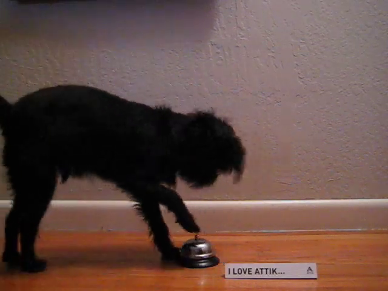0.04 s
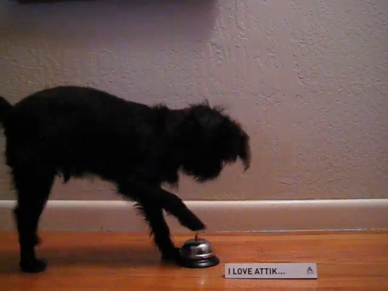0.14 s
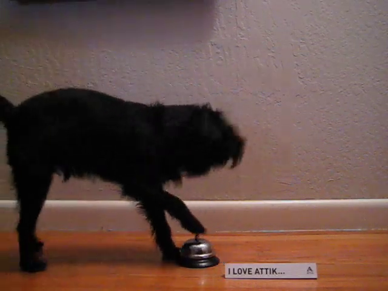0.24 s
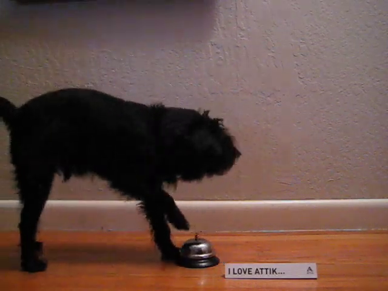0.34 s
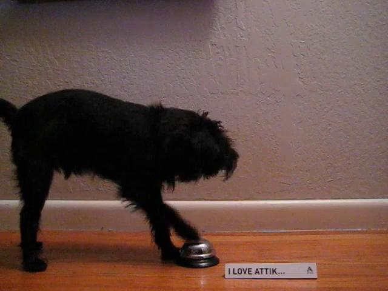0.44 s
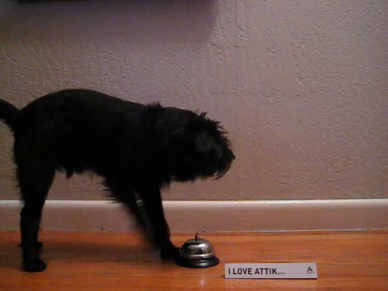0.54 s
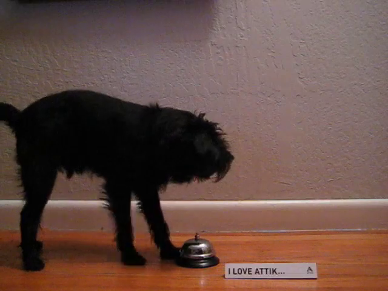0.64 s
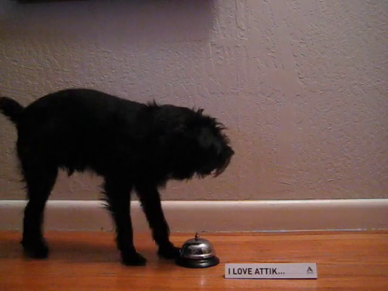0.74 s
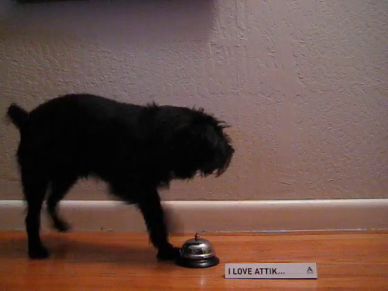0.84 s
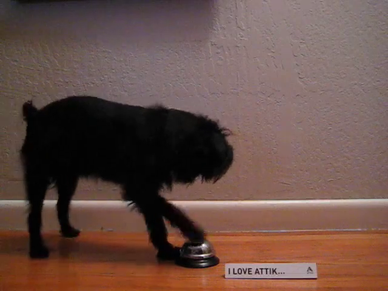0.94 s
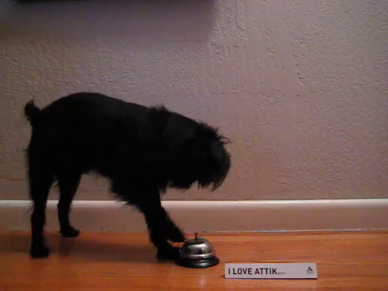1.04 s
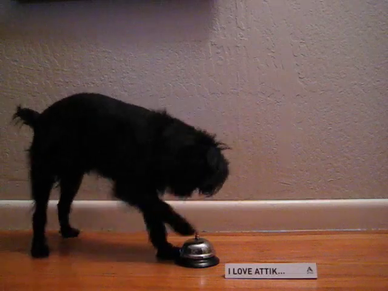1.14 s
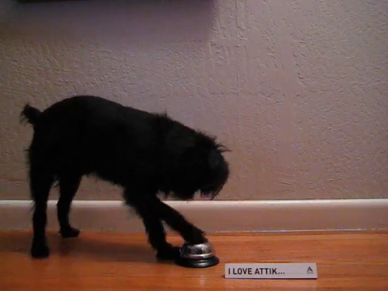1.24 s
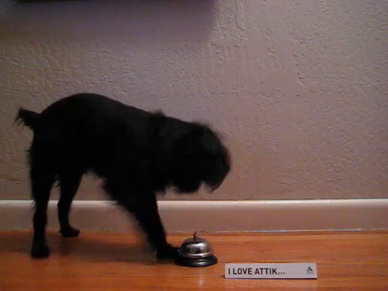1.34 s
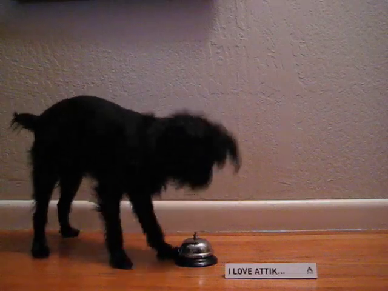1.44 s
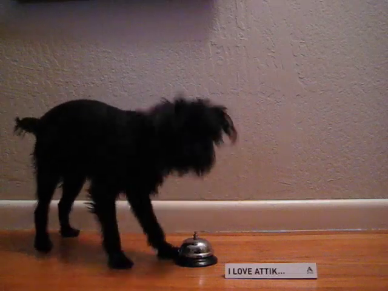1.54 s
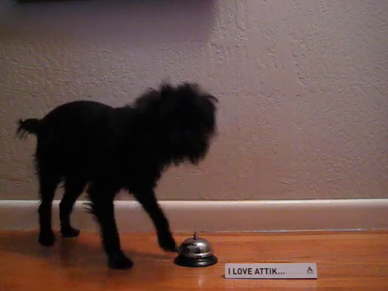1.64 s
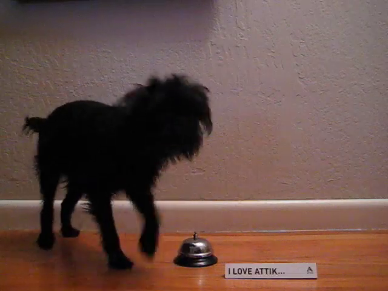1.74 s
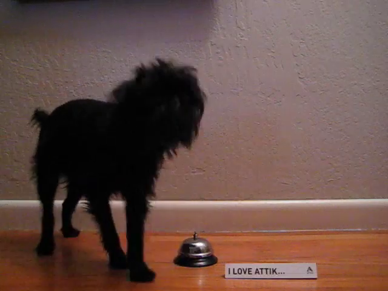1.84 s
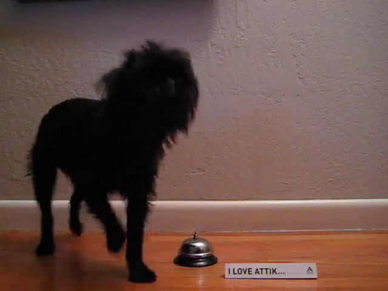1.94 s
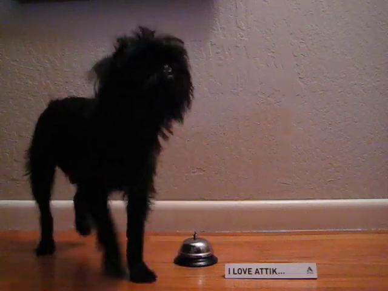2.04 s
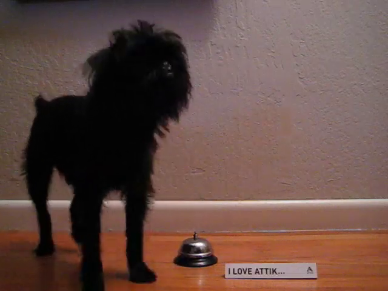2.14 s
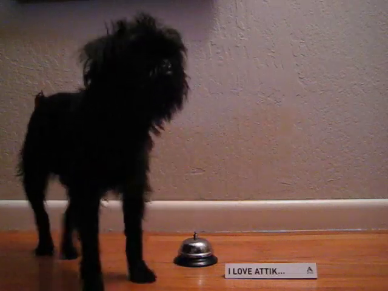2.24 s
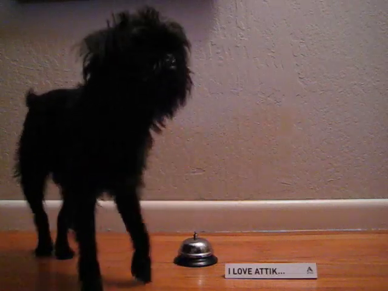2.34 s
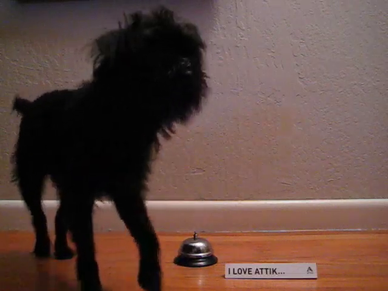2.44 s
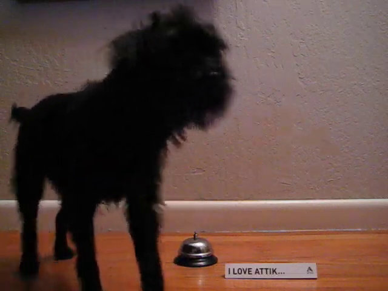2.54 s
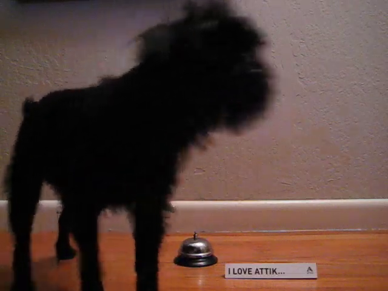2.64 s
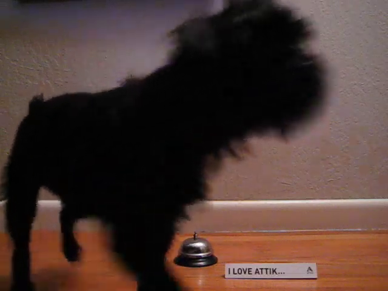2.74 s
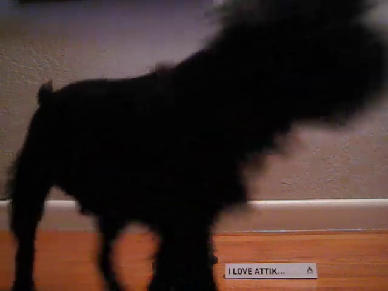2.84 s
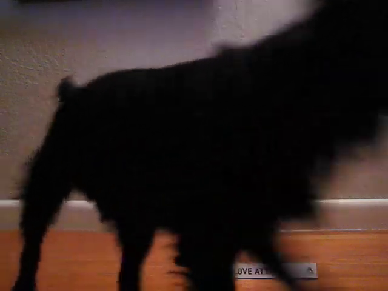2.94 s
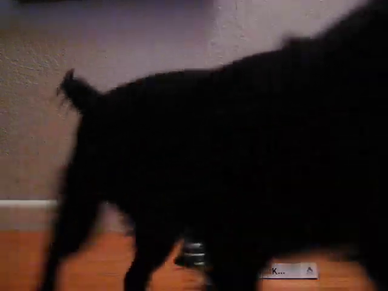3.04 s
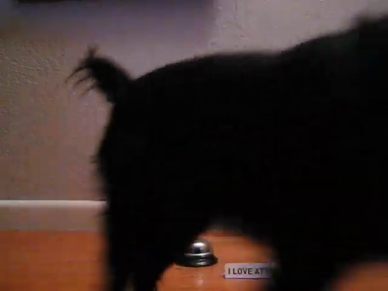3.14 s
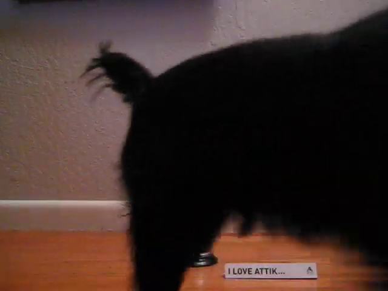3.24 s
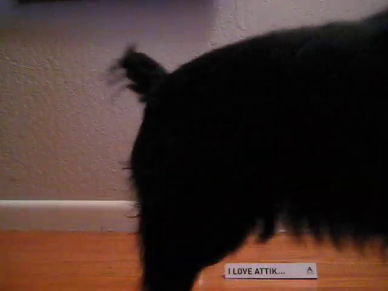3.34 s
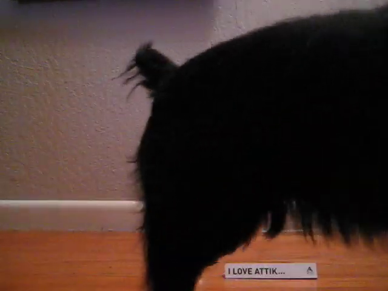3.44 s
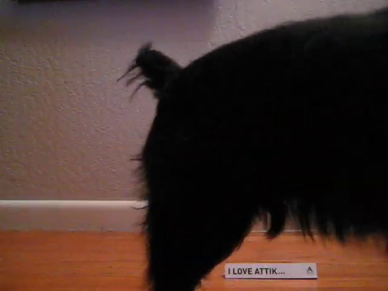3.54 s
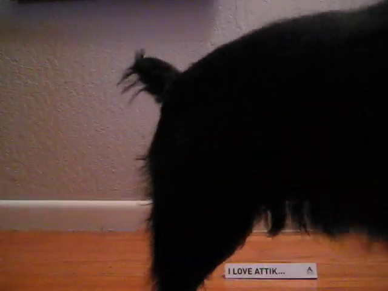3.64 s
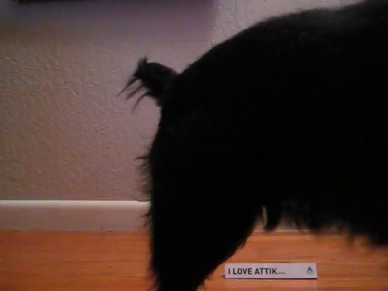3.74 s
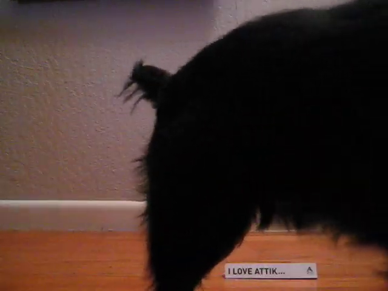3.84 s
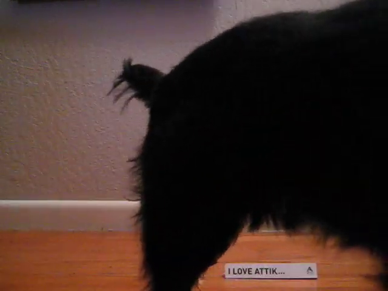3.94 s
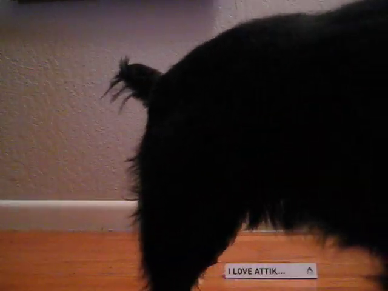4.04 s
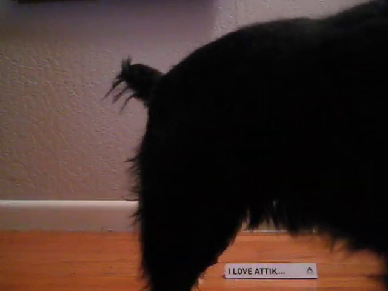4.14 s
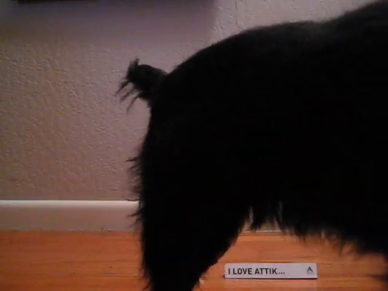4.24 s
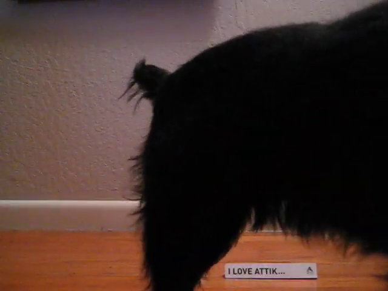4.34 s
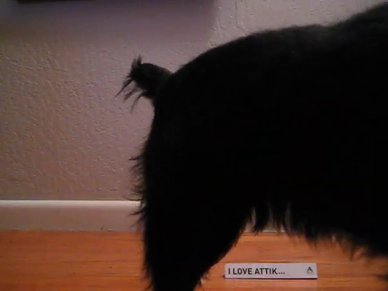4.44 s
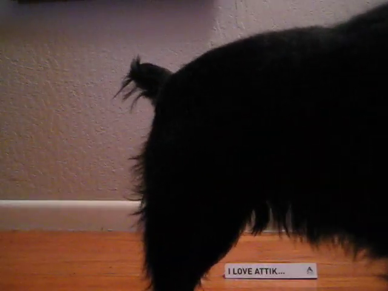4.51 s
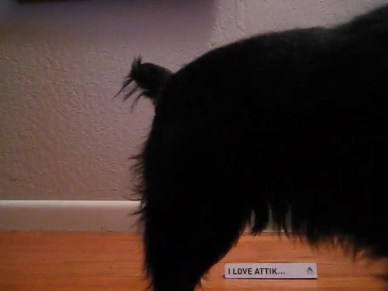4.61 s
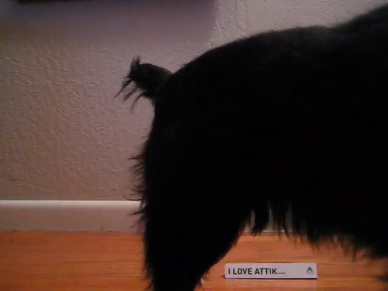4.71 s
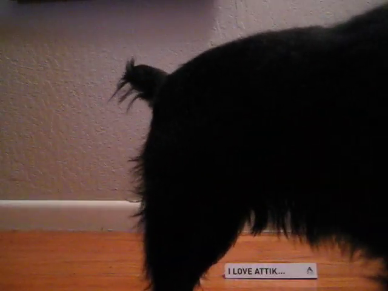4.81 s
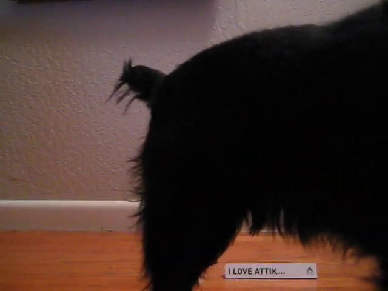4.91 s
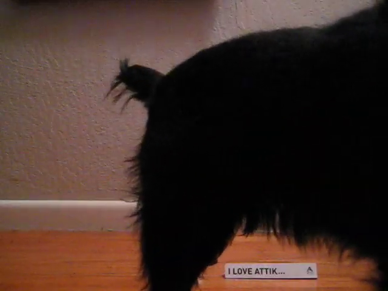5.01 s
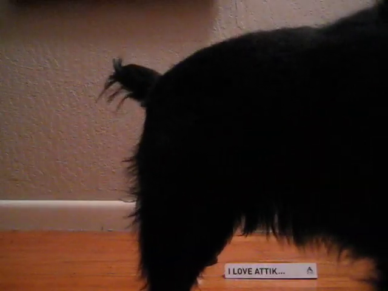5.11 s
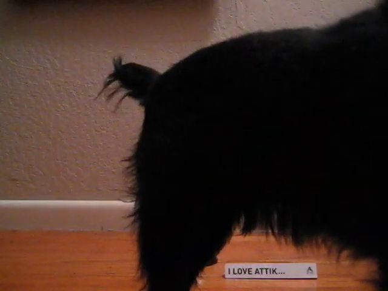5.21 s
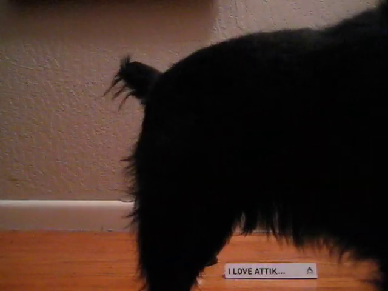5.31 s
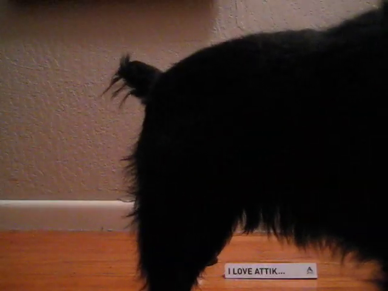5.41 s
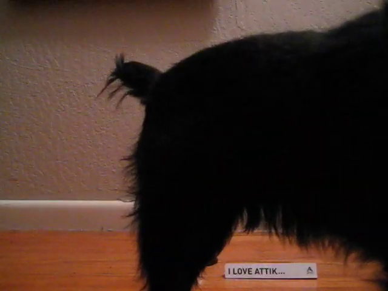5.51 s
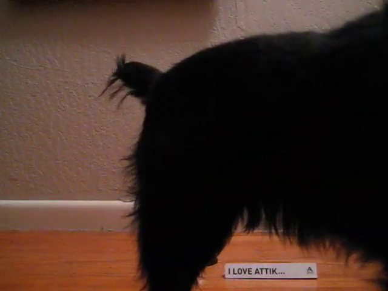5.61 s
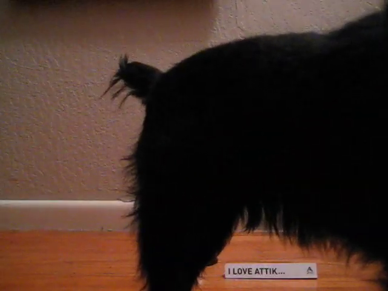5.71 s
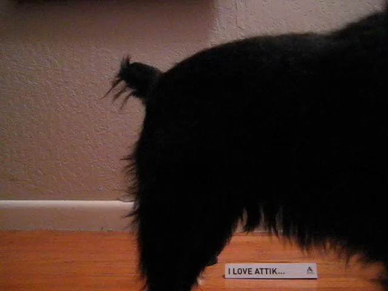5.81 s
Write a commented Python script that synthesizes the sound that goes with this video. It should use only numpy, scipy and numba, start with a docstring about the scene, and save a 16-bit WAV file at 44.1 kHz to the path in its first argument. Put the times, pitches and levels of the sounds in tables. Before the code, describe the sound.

A steady hiss and faint hum run throughout in a small room with a bare wooden floor. In the first second or so, a dog's paw nudges a steel desk bell, making light scrapes and damped metallic clicks, the clearest at about 0.5 seconds, with a claw tap on the floor just after. At 1.3 seconds the bell is struck once: a sharp, slightly clipped crack and a loud, bright ding. Its highest overtones die quickly, while the main tone wavers and fades slowly, lingering faintly to the end. From 1.4 to about 4.1 seconds, claws tick unevenly on the boards as the dog approaches the microphone, strongest around 3 seconds. From about 4.4 to 5.7 seconds the dog chews close to the microphone, with small wet smacks and lip clicks, soft coat rustles and a faint dull rumble from the floor.

```python
"""A steel desk bell on a wooden floor, pawed at and rung once by a small dog, in a small room.
The clapper cracks on the dome, which rings in close pairs of modes that beat. Claws tick on the
boards as the dog walks up to the camera, then it chews close to the microphone, its coat rustling.
The camera hums and hisses; its gain control ducks under the ring and its input clips the strike."""
import sys
import numpy as np
from scipy import signal
from scipy.fft import rfft, irfft, next_fast_len
from scipy.io import wavfile
from scipy.ndimage import uniform_filter1d
from numba import njit

SR = 44100
rng = np.random.default_rng(int(sys.argv[2]) if len(sys.argv) > 2 else 0)


def generate_wav(sig):
    """Save sig (samples, or channels by samples) to the path in sys.argv[1] as 16-bit PCM at SR."""
    pcm = np.round(np.clip(np.atleast_2d(sig).T, -1, 1) * 32767).astype(np.int16)
    wavfile.write(sys.argv[1], SR, pcm)


N = 258867
T = np.arange(N) / SR

STRIKE_S, SWELL_S = 1.3016, 0.16  # the blow, and the time the room takes to build up a tone
# The dome's four main pairs of modes. Each row: frequency in Hz, split to the twin in Hz.
DOME_PAIRS = [(1342.6, 2.82), (3672.4, 1.405), (6845, 13), (10662, 4.6)]
# How those pairs ring. Each row: level in dB, t60 in seconds, the twin's relative size,
# its t60 in seconds, opening swell in dB (negative: the tone starts loud and settles).
PAIR_RINGS = [(-26, 11.35, 0.27, 18.5, -7.5), (-8, 4.49, 0.11, 7.5, 13), (-12, 1.36, 0.66, 1.25, 1.5),
              (-7.5, 0.45, 0.73, 0.42, -2)]
# The dog passes between bell and microphone, shading and reflecting the two lowest pairs.
# Each row: time in seconds, gain of the first pair in dB, gain of the second in dB.
DOG_SHADE = [(1.47, -0.5, 0), (1.66, 4.5, 1.5), (1.83, -0.5, 1), (2.01, 2, 2.5), (2.17, 2.5, -1),
             (2.45, 4.5, 4), (2.7, 1, -0.5), (2.775, 3.5, -7.5), (2.96, 2.5, 1.5), (3.2, 2.5, -7.5),
             (3.42, -0.5, 3.5), (3.7, 2, 0)]
# The dome rocks on its post, so the third pair beats unevenly.
# Each row: time in seconds, change of the split in Hz.
DOME_ROCKING = [(1.3, 7), (1.4, 1.5), (1.53, 1), (1.63, -3.5), (1.75, -1.5), (1.87, .5), (1.97, -4),
                (2.07, 1), (2.3, -2)]


def bell_ring():
    """The dome is not quite round, so each main mode has a twin; the two start opposed and beat."""
    out, t = np.zeros(N), T[:N - int(STRIKE_S * SR)]
    times, first_db, second_db = np.transpose(DOG_SHADE)
    shades_db = [np.interp(t + STRIKE_S, times, first_db), np.interp(t + STRIKE_S, times, second_db), 0, 0]
    rocking_hz = np.interp(t + STRIKE_S, *np.transpose(DOME_ROCKING))
    drift_cycles = [0, 0, np.cumsum(rocking_hz) / SR, 0]
    shimmer_db = [0, 0, 0.5 * wander(7.3)[:len(t)], 0]  # rocking also makes the third twin waver
    swell_left = np.maximum(1 - t / SWELL_S, 0)
    for i, (hz, split_hz) in enumerate(DOME_PAIRS):
        db, t60, twin_size, twin_t60, swell_db = PAIR_RINGS[i]
        mode = fade(t, t60) * np.sin(2 * np.pi * hz * t)
        twin_cycles = (hz + split_hz) * t + drift_cycles[i]
        twin = twin_size * amp(shimmer_db[i]) * fade(t, twin_t60) * np.sin(2 * np.pi * twin_cycles)
        gain = np.sqrt(2) * amp(db + shades_db[i] - swell_db * swell_left)
        add(out, STRIKE_S, gain * (mode - twin))
    add(out, STRIKE_S, amp(-25.5) * overtones(ring_share=0.93, tilt_db=7.5))
    return out


# The dome's weaker, short modes. Each row: frequency in Hz, relative level in dB, t60 in seconds.
SHORT_MODES = [(3187, -14, .7), (3668, 0, .6), (3908, -12, .7), (4463, -2, .5), (4780, -11, .9),
               (4953, -3, .25), (6379, -4, .5), (8400, -6, .3), (9318, -6, .3), (9943, -12, .4),
               (10206, -7, .4), (10304, -4, .45), (11194, -3, .43), (14970, -15, .22), (15620, -12, .14)]


def overtones(ring_share, tilt_db):
    """The dome's short modes after a blow, each with a close twin, tilted by tilt_db per octave."""
    out, t = np.zeros(SR), T[:SR]
    twin_size, split_spread_hz = 0.97, 18
    for hz, db, t60 in SHORT_MODES:
        twin_hz = hz + split_spread_hz * rng.standard_normal()
        pair = np.sin(2 * np.pi * hz * t) + twin_size * np.cos(2 * np.pi * twin_hz * t)
        octaves = np.log2(hz / SHORT_MODES[0][0])
        out += amp(db + tilt_db * octaves) * fade(t, t60 * ring_share) * pair
    return out / np.hypot(1, twin_size)


# The clapper's crack on the dome. Each row: frequency in Hz, relative level in dB.
CRACK_SPECTRUM = [(30, -9), (200, -29), (600, -8.5), (1400, -4), (2500, -12.5), (3700, 6.5), (5200, -14),
                  (6850, 2), (8500, -14), (10700, 9), (13000, -17), (16000, -14)]


def clapper():
    """Steel hits steel and chatters once; a short low thump and a dull knock sound with the strike."""
    out = np.zeros(N)
    add(out, STRIKE_S, sized(colour(burst(t60=0.011), CRACK_SPECTRUM), db=7))
    add(out, STRIKE_S + 0.0026, sized(colour(burst(t60=0.01), CRACK_SPECTRUM), db=8.5))
    thump_spectrum = [(25, -1), (120, 0), (400, -6), (600, -3), (1500, -25)]
    add(out, STRIKE_S, sized(colour(burst(t60=0.014), thump_spectrum), db=-12))
    return out


# The paw tries the bell, down on the floor, before the strike.
# Each row: start in seconds, relative level in dB, share of the free ring time left by the paw.
PAW_NUDGES = [(0.1141, -43, 0.15), (0.515, -41, 0.02), (0.5186, -21, 0.29), (1.0256, -35, 0.9),
              (1.257, -45.5, 0.6), (1.282, -37, 0.95), (1.292, -32, 0.47)]


def paw_nudges():
    """A claw scrapes the dome and faintly wakes its modes, which the paw damps."""
    out = np.zeros(N)
    scrape_spectrum = [(700, -26), (2700, -14.5), (4500, 2.5), (5500, -9),
                       (7000, -13.5), (8700, -3.5), (12000, -19), (16000, -20.5)]
    loudest_mode, free_t60 = np.sin(2 * np.pi * DOME_PAIRS[1][0] * T), PAIR_RINGS[1][1]
    for start, db, ring_share in PAW_NUDGES:
        add(out, start, sized(colour(burst(t60=0.024), scrape_spectrum), db + 12))
        add(out, start, amp(db - 9) * overtones(ring_share, tilt_db=-8))
        add(out, start, amp(db - 33) * fade(T, free_t60 * ring_share) * loudest_mode)
    return out


# Paws on the boards, from the bell up to the microphone. Each row: start in seconds, relative level
# in dB, tilt in dB per octave, second claw's delay in seconds, its level against the first in dB.
FOOTFALLS = [(0.6414, -7.5, -0.5, 0.034, -13.5), (0.8575, -22.5, -1.5, 0.0033, 10.5),
             (1.3862, -12, 5, 0.0023, -12), (1.4486, -11.5, -2, .003, -16), (1.6728, -19, 5, 0.005, -4.5),
             (1.9075, -22, -2, 0.012, -2), (1.9755, -17, 0, 0.013, -8), (2.2083, -32, -6, 0.0028, -2),
             (2.381, -22.5, 1, .0092, 0), (2.7096, -9, 1, .0059, -5), (2.9122, -16, -2, .002, -16),
             (2.9386, -6.5, 0.5, .002, -22), (3.1401, -8.5, 2.5, 0.0026, -18), (3.2224, -24, -2, .004, 7.5),
             (3.5493, -27.5, 2, 0.012, 11.5), (3.6937, -28, 2, 0.003, -18), (4.1091, -28.5, -5, .002, -13)]


def footsteps():
    """At each footfall two claws land, one just after the other."""
    out = np.zeros(N)
    for start, db, tilt_db, delay, second_db in FOOTFALLS:
        add(out, start, claw(db, tilt_db))
        add(out, start + delay, claw(db + second_db, tilt_db))
    return amp(-3.5) * out


# A claw on the bare wooden floor. Each row: frequency in Hz, relative level in dB.
TICK_SPECTRUM = [(300, -21.5), (1000, -18), (2200, 0), (3800, 0), (6000, -3), (9000, -3), (13400, -14.5),
                 (16000, -20.5)]


def claw(db, tilt_db):
    """A sharp tick and a grainy skid, never quite the same colour; tilt_db sets its brightness."""
    skid = amp(-10.5) * burst(t60=0.046)
    grains = amp(2.2 * wander(1100)[:len(skid)])
    lowest_hz, scatter_db = TICK_SPECTRUM[0][0], 5.5
    spectrum = [(hz, level + tilt_db * np.log2(hz / lowest_hz) + scatter_db * rng.standard_normal())
                for hz, level in TICK_SPECTRUM]
    tick = burst(t60=0.0061)
    return sized(colour(tick + skid * grains, spectrum), db)


# The dog chews close to the microphone. Each row: start in seconds, the mouth's relative level in dB,
# its resonance in Hz, its Q, the lip snap's relative level in dB.
MOUTH_SMACKS = [(4.372, -24.5, 3870, 2.5, -41), (4.378, -19.5, 5300, 2.5, -24.5),
                (4.3778, -13.5, 1530, 0.87, -42), (4.647, -38, 5000, 1, -23),
                (4.6836, -16.5, 3600, 3.7, -40), (5.0278, -31, 5000, 0.89, -25),
                (5.182, -35, 2500, 1, -33.5), (5.236, -27, 3740, 1.9, -29), (5.296, -40, 3000, 1, -33),
                (5.309, -29, 3000, 1.6, -23.5), (5.323, -24, 2000, 1.9, -44), (5.545, -28, 4100, 1, -30),
                (5.6134, -18.5, 2550, 1, -17)]
SNAP_HZ, SNAP_Q, SNAP_T60_S = 12300, 2.2, 0.0054


def chewing():
    """Each smack rings the mouth and snaps twice at the lips; faint wet ticks fall in between."""
    out = np.zeros(N)
    for start, mouth_db, mouth_hz, mouth_q, snap_db in MOUTH_SMACKS:
        add(out, start, click(mouth_db, mouth_hz, mouth_q, t60=0.01))
        add(out, start, click(snap_db, SNAP_HZ, SNAP_Q, SNAP_T60_S))
        add(out, start + 0.009, click(snap_db - 10, SNAP_HZ, SNAP_Q, SNAP_T60_S))
    for _ in range(16):
        start = rng.uniform(4.6, 5.75)
        hz = 2000 * (SNAP_HZ / 2000) ** rng.random()
        add(out, start, click(rng.uniform(-38.5, -34.5), hz, q=1.4, t60=SNAP_T60_S))
    return amp(-2.5) * out


def click(db, hz, q, t60):
    """A short crackle that rings one broad resonance."""
    b, a = signal.iirpeak(hz, q, fs=SR)
    return sized(signal.lfilter(b, a, signal.lfilter(b, a, burst(t60))), db)


# The dog shifts its weight, mostly beside the microphone.
# Each row: start in seconds, length in seconds, coat rustle in dB, floor rumble in dB.
WEIGHT_SHIFTS = [(0, 0.061, -40.5, -62), (4.595, 0.29, -47, -63), (4.958, 0.15, -44.5, -43),
                 (5.098, 0.23, -47.5, -49.5), (5.591, 0.088, -38.5, -58)]


def shuffles():
    """The coat rustles in soft, grainy swells, with a dull rumble from the boards."""
    out = np.zeros(N)
    fur_spectrum = [(400, -10), (1400, 3.5), (2800, 1.5), (5000, -7.5), (11000, -19), (16000, -19)]
    board_spectrum = [(40, -22), (130, -3), (260, 0), (500, -5), (1500, -32)]
    fur = unit(colour(rng.standard_normal(N) * amp(3.6 * wander(200)), fur_spectrum))
    boards = unit(colour(rng.standard_normal(N), board_spectrum))
    for start, length, fur_db, rumble_db in WEIGHT_SHIFTS:
        swell = np.sin(np.pi * np.clip((T - start) / length, 0, 1))
        out += swell * (amp(fur_db) * fur + amp(rumble_db) * boards)
    return out


def room(x, t60, wet_db):
    """Reflections of a small room with a bare floor, sparse at first and then dense."""
    t = T[:SR]
    noise = rng.standard_normal(SR)
    early_spikes = np.exp(np.exp(-t / 0.023) * rng.standard_normal(SR) / 2)
    echoes = noise * early_spikes * fade(t, t60) * (t > 0.004)
    echoes = colour(echoes, [(200, -3.5), (3000, -2), (8000, -4.5), (15000, -8)])
    return amp(wet_db) * signal.fftconvolve(x, echoes / np.sqrt(np.sum(echoes ** 2)))[:N]


# Room air and camera hiss at the microphone. Each row: frequency in Hz, relative level in dB.
HISS_SPECTRUM = [(15, -55), (25, -9.5), (223, 0.5), (405, -3), (714, -0.5), (1230, -2.5), (1330, -3),
                 (1790, -6.5), (2910, -10), (4610, -16), (11600, -22), (12500, -26.5), (14800, -20),
                 (16000, -18.5)]
# The camera's motor and electronics, right by the microphone. Each entry: a tone's frequency in Hz.
CAMERA_TONES_HZ = [240, 599, 719, 958, 7560, 15150, 15734]
# The strength of those tones. Each entry: rms level in dB.
CAMERA_TONES_DB = [-61.5, -63.5, -57, -58, -66, -82, -81]


def hiss_and_hum():
    """Steady hiss under the slightly wavering whine of the camera."""
    out = unit(colour(rng.standard_normal(N), HISS_SPECTRUM)) * amp(-42.5 + 0.43 * wander(3))
    for hz, db in zip(CAMERA_TONES_HZ, CAMERA_TONES_DB):
        gain = np.sqrt(2) * amp(db + 1.1 * wander(4.2))
        cycles = np.cumsum(hz + 1.46 * wander(9)) / SR
        out += gain * np.sin(2 * np.pi * cycles)
    return out


def amp(db):
    return 10 ** (np.asarray(db) / 20)


def unit(x):
    return x / np.sqrt(np.mean(x ** 2))


def fade(t, t60):
    """Exponential decay, 60 dB down after t60."""
    return np.exp(-np.log(1000) * t / t60)


def add(track, start, sound):
    """Mix a sound into a track from `start` seconds."""
    i = int(start * SR)
    track[i:i + len(sound)] += sound[:N - i]


def colour(x, points):
    """Causal (minimum-phase) filter through (Hz, dB) points."""
    size = 2 * next_fast_len(len(x))
    hz, db = np.transpose(points)
    freqs = np.maximum(np.arange(size // 2 + 1) * SR / size, 1)
    gains = amp(np.interp(np.log(freqs), np.log(hz), db))
    cepstrum = irfft(np.log(gains))
    cepstrum[1:size // 2] *= 2
    cepstrum[size // 2 + 1:] = 0
    return irfft(rfft(x, size) * np.exp(rfft(cepstrum)))[:len(x)]


def wander(rate_hz):
    """Smooth random drift with an rms of 1."""
    span = int(SR / rate_hz)
    stairs = np.repeat(rng.standard_normal(N // span + 1), span)
    return unit(uniform_filter1d(uniform_filter1d(stairs, span), span)[:N])


def burst(t60, size=4096):
    """A contact: a dying flurry of tiny impacts."""
    return rng.choice([-1, 1], size) * fade(T[:size], t60)


def sized(x, db, size=32):
    """Give a click the energy of `size` samples at level db."""
    return x * amp(db) * np.sqrt(size / np.sum(x ** 2))


@njit
def hold(level, release):
    """Follow rises at once and let go slowly."""
    out, held = np.empty(len(level)), 0.
    for i in range(len(level)):
        held = max(level[i], held * release)
        out[i] = held
    return out


def gain_control(x, top_db, attack_s, release_s):
    """The camera turns its gain down whenever the running level passes the top."""
    pole = np.exp(-1 / (attack_s * SR))
    rms = np.sqrt(signal.lfilter([1 - pole], [1, -pole], x ** 2))
    level = hold(rms, np.exp(-1 / (release_s * SR)))
    return x / np.maximum(level / amp(top_db), 1)


def scene():
    """Bell, paws and mouth in a small room, heard from the camera's one microphone."""
    strike, nudges, steps, mouth = clapper(), paw_nudges(), footsteps(), chewing()
    # the mouth is close to the microphone, so less of it comes back from the walls
    to_walls = amp(-3) * strike + amp(-2) * nudges + amp(-1.5) * steps + amp(-5.5) * mouth
    walls = room(to_walls, t60=0.5, wet_db=-6)
    return (bell_ring() + strike + nudges + steps + mouth + shuffles() + walls + hiss_and_hum())[None]


def record(dry):
    """The camera's gain control, an input that clips the strike, and a steep cut above 16 kHz."""
    ducked = gain_control(dry[0], top_db=-17, attack_s=0.01, release_s=0.27)
    clipped = np.clip(ducked, -0.48, 0.48)
    top_cut = signal.ellip(8, 0.2, 70, 16000, fs=SR, output="sos")
    return signal.sosfilt(top_cut, clipped)[None]


dry = scene()
out = record(dry)
generate_wav(out)
```